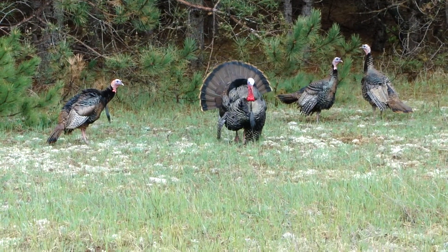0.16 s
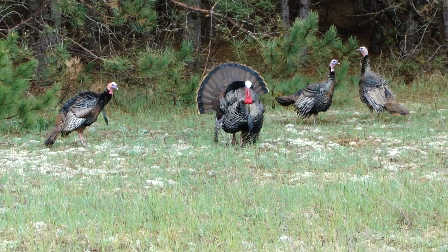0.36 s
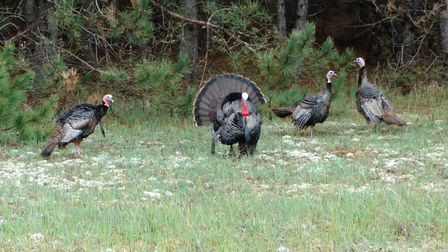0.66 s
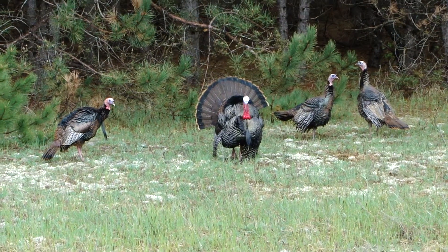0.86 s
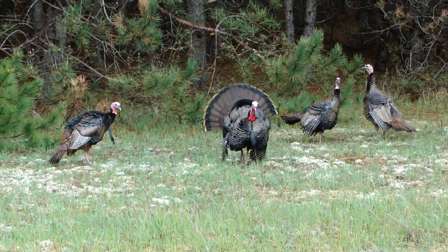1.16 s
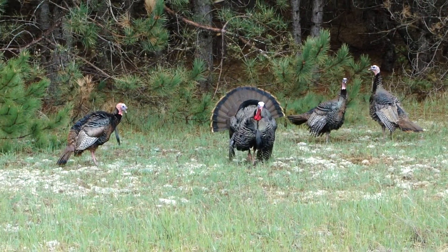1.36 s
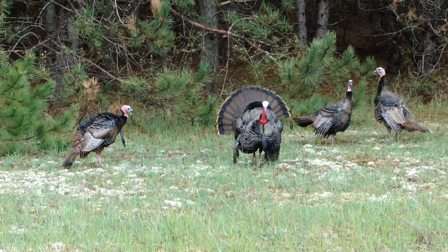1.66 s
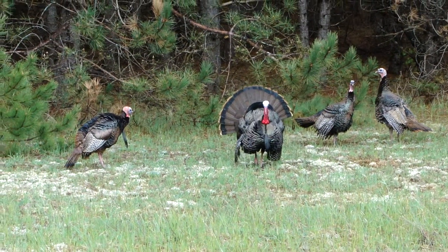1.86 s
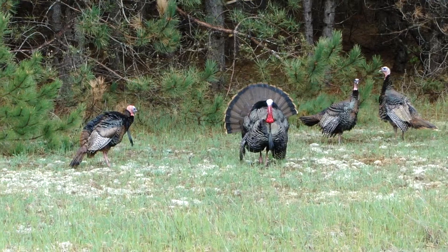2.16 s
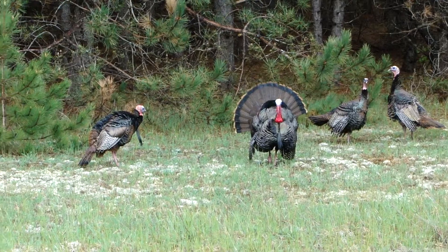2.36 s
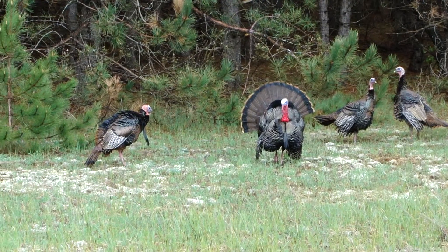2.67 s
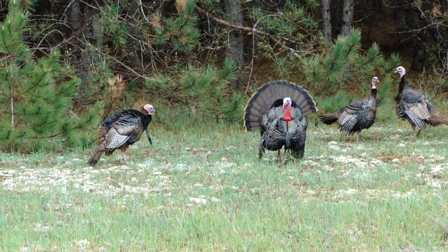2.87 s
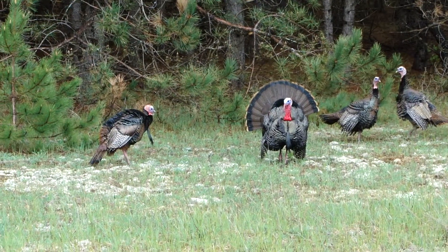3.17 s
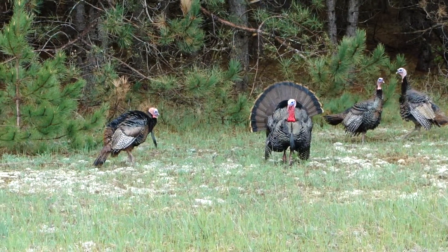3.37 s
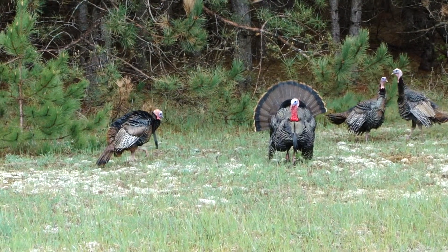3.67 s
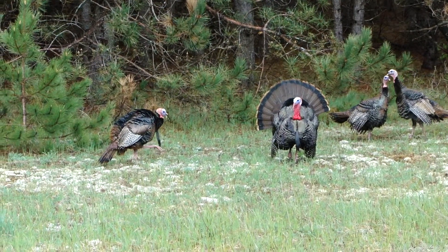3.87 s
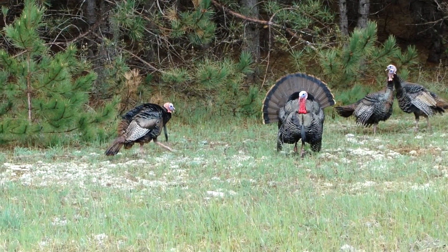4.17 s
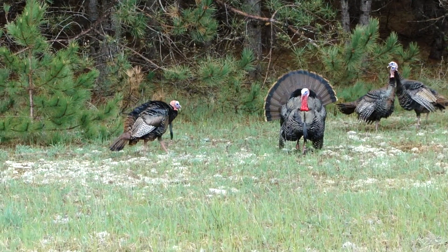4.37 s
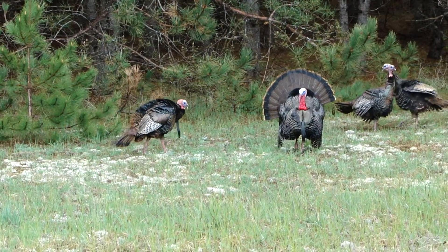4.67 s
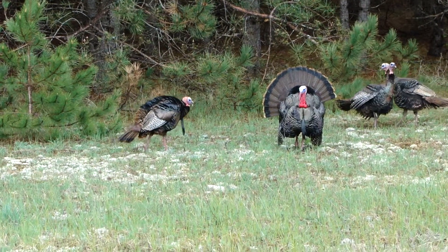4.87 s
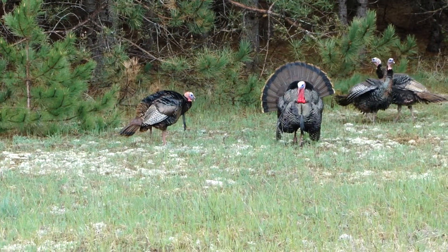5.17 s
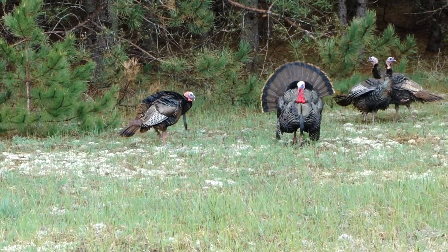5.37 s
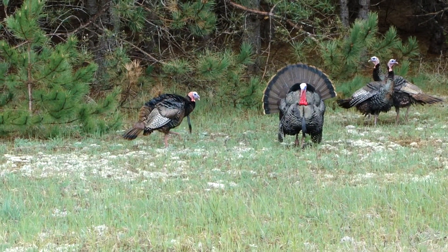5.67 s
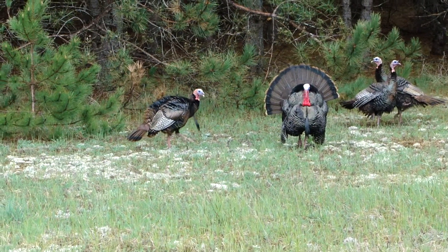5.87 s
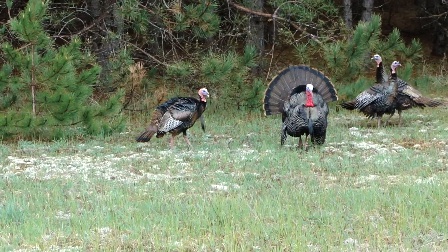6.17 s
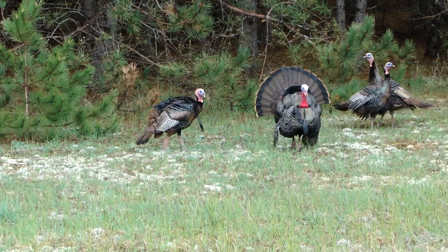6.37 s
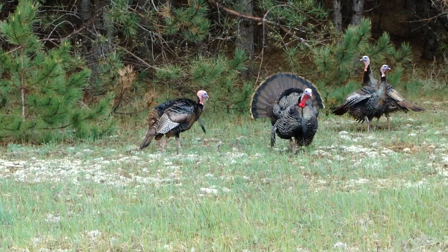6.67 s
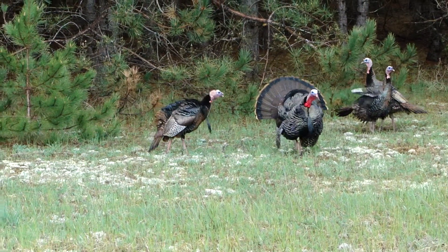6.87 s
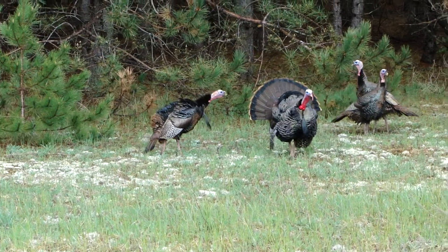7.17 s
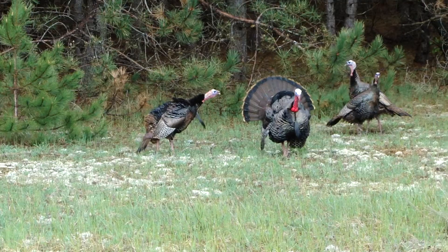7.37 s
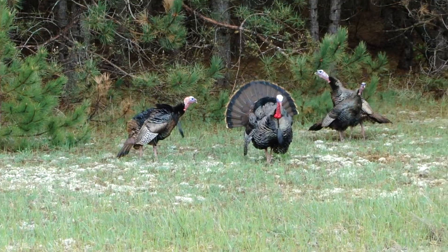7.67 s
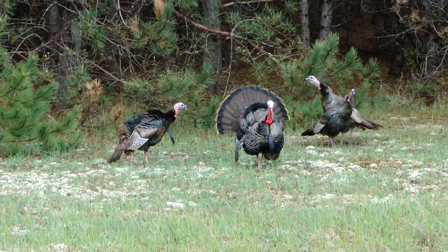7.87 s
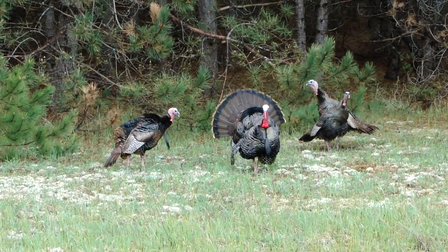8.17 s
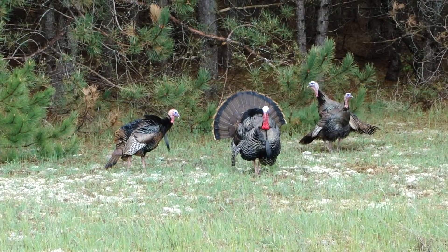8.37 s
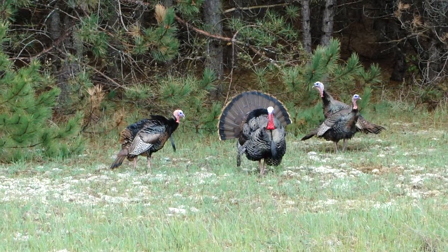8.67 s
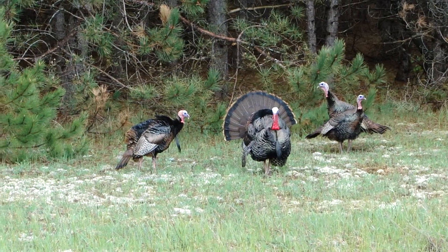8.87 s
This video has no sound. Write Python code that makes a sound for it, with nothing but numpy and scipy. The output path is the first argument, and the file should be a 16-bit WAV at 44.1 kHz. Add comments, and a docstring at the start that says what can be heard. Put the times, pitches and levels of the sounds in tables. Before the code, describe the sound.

In a grassy clearing by pines, soft air and a faint wavering hum lie under a turkey's thin whine and steady hoarse yelps. A short shrill gobble bursts across the early yelps, and a tiny far songbird trills twice. Then seven sharp, loud cutts come close to the microphone with small bill clicks, and a deeper, long gobble with a rattling middle answers, echoing off the trees.

```python
"""Soft air and a wavering hum fill a clearing by pines; a stem snaps now and then while a wild turkey
whines and yelps. A short gobble cuts across the yelps, and a small far bird trills in quick upward slurs.
Seven loud, close cutts follow, with bill clicks around them; a long gobble with a rattling middle answers.
Each call is a tone of the syrinx (the bird's voice box), clean or rough, shaped by four throat resonances.
Small sounds are short noise bursts, the trill is sine slurs, and the trees echo the turkeys."""
import sys
import numpy as np
from scipy import signal
from scipy.fft import rfft, irfft, next_fast_len
from scipy.io import wavfile

SR = 44100
rng = np.random.default_rng(int(sys.argv[2]) if len(sys.argv) > 2 else 0)


def digitize_waveform(pressure):
    """Quantize a signal to 16-bit integers and store it at the path in sys.argv[1].

    Rows of a 2-D input are taken as channels; values are limited to [-1, 1].
    """
    field = np.atleast_2d(pressure).T
    bounded = np.clip(field, -1, 1)
    quanta = np.round(bounded * 32767).astype(np.int16)
    wavfile.write(sys.argv[1], SR, quanta)


N = 398223  # length of the scene in samples, about 9 s

# A colour is the strength of throat resonances 2, 3 and 4 over the first, in dB.
# A bend is the pitch at start, middle and end, as multiples of a given pitch.
# Call levels are set before the bird's own gain_db; brightness is added to all three colour values.

# Still air, shape of its spectrum: frequency_hz, relative_level_db (per Hz)
AIR_SPECTRUM = [(15, -56), (25, -10), (86, -28), (102, -22), (189, -8.5), (293, -3), (388, -6.5), (419, -3),
                (556, -7), (838, -4.5), (1260, -12.5), (1630, -15), (3340, -24.5), (4790, -30),
                (11400, -39.5), (14900, -62), (22000, -120)]
# Left-right difference in the air, before side_db: frequency_hz, side_over_middle_db
AIR_WIDTH = [(60, -15), (110, -4), (190, -16), (340, -8.5), (610, -5.5), (1080, -3.5), (1940, -1),
             (3450, 2.5), (6160, -1), (11000, -4.5)]
AIR_DB = -43  # middle level of the air, before it sways

# Snapping stems: start_s, peak_db (before gain_db), centre_hz, left_minus_right_db
STEM_SNAPS = [(0.049, -36, 3840, 1), (2.8276, -33, 3930, 19), (4.316, -24.5, 10400, -17),
              (4.4268, -29, 4200, -12)]
# Bill clicks: start_s, peak_db (before gain_db), centre_hz, left_minus_right_db
BILL_CLICKS = [(5.162, -24.5, 1260, -11), (5.416, -22, 1260, -10), (5.685, -28, 1040, -7),
               (5.944, -25.5, 1560, -10), (6.176, -25.5, 1500, -15), (6.209, -27, 1670, -11),
               (8.336, -33, 2050, -15)]

# Thin whines before the yelps: start_s, length_s, level_db
WHINE_NOTES = [(0.077, 0.094, -43), (0.379, 0.0534, -25.5)]
WHINE_HZ, WHINE_BEND, WHINE_COLOUR = 762, (0.89, 1, 1.03), (13.7, 5.5, 2.2)

# A yelp opens as a whistle, breaks down an octave into a bright rasp, then darkens and sags.
# Yelps: start_s, length_s, whistle_s, whistle_over_rasp_db, rasp_level_db, break_brightness_db
YELP_NOTES = [(0.425, 0.059, 0.00049, 0, -26.5, -6), (0.658, 0.119, 0.00094, 16, -25, 2.5),
              (0.941, 0.086, 0, 0, -24.5, 2.5), (1.623, 0.131, 0.0022, 0, -22.5, -2.5),
              (1.975, 0.12, 0.026, 0.5, -23, 2), (2.321, 0.12, 0.019, 0, -24, 3.5),
              (2.672, 0.111, 0.034, 2, -24, -2.5), (3.037, 0.12, 0.044, 0, -24.5, -1.5),
              (3.446, 0.12, 0.048, 1.5, -24.5, -6), (3.827, 0.14, 0.02, 2, -26.5, 0)]
YELP_HZ, BREAK_ENDS_S, OVERLAP_S = 545.4, 0.062, 0.008
WHISTLE_BEND, WHISTLE_COLOUR = (2.04, 2.03, 1.897), (-8, -11.5, -31)
BREAK_BEND, BREAK_COLOUR = (1.01, 1.005, 0.98), (-1.5, -7, -17)
SAG_BEND, SAG_COLOUR = (1, 0.98, 0.905), (-26, -13.5, -19.5)

# In a gobble note the syrinx tightens and lets go: the pitch arches from a dark, slack gulp and back.
# Gobble notes: start_s, length_s, place_of_top (0-1), top_pitch_hz, level_db, rasp_when_tight (0-1),
# then the colour at the top: second_db, third_db, fourth_db
GOBBLE_NOTES = [(0.966, 0.033, 0.65, 875, -16, 0.72, 2, -4, 18),
                (1.028, 0.043, 0.53, 762, -17.5, 0.69, -4, -20, 1),
                (1.177, 0.024, 0.46, 639, -21.5, 0.64, -1.5, -5.5, -6),
                (1.222, 0.095, 0.46, 670, -21, 0.37, 2.5, 3.5, -11),
                (1.318, 0.05, 0.65, 520, -18.5, 0.77, -12, -12, -17),
                (1.362, 0.031, 0.48, 628, -19.5, 0.23, 4, 14, -2),
                (1.414, 0.016, 0.98, 506, -15, 0.1, -18, -16, -15),
                (1.43, 0.0525, 0.318, 654, -17, 0.04, 19.5, 29, 19),
                (1.545, 0.008, 0.5, 477, -24, 0.3, -30, -12, -14),
                (6.407, 0.035, 0.97, 686, -14, 0.13, 23.5, -23, 23.5),
                (6.472, 0.029, 0.93, 625.4, -19, 0.46, 12.5, -15, 8),
                (6.635, 0.022, 0.2, 534, -21.5, 0.46, -9, -12, -13),
                (6.683, 0.019, 0.86, 495, -21, 0.16, -9, -24, -19),
                (6.7, 0.046, 0.35, 667, -24, 0.57, 6, 0, 8.5),
                (6.799, 0.042, 0.55, 750, -19.5, 0.25, 7.5, 11.5, 8.5),
                (6.848, 0.026, 0.4, 523, -22, 0.79, -1, -19, -7.5),
                (6.878, 0.065, 0.64, 789, -17.5, 0.28, 5, 2.5, 0.5),
                (6.995, 0.045, 0.51, 624, -26.5, 0.5, 0.5, -8, -7.5),
                (7.041, 0.025, 0.67, 797, -17, 0.38, -1.5, -20, -14),
                (7.068, 0.049, 0.28, 814, -24.5, 0.52, -5, -9, -12),
                (7.116, 0.043, 0.83, 774, -21, 0.25, 2, -5.5, -9),
                (7.203, 0.03, 0.24, 778, -25.5, 1, -4.5, -11, -14),
                (7.242, 0.036, 0.19, 782, -27, 0.22, -2, -4, -9),
                (7.268, 0.033, 0.63, 581, -22, 0.19, 20, 20, 6),
                (7.343, 0.085, 0.6, 704, -13.5, 0.11, 15, 21, -1),
                (7.45, 0.052, 0.13, 595, -29, 0.45, -12, -11, -10),
                (7.915, 0.024, 0.55, 592, -20.5, 1, -22, 1.5, -1.5),
                (7.936, 0.081, 0.22, 668, -23, 0.58, -6, 1.5, -1.5),
                (8.038, 0.022, 0.45, 503, -26, 1, -4.5, -9, -7.5),
                (8.126, 0.063, 0.52, 652, -26, 1, -2, 5, -2),
                (8.207, 0.039, 0.23, 537.5, -17, 0.56, -44, 0.5, -6.5),
                (8.233, 0.025, 0.19, 872, -20.5, 0.12, -17, 11, -7),
                (8.254, 0.024, 0.28, 522, -18.5, 0.9, -17, -9, -16)]
SLACK_HZ = 484.2  # pitch at rest
TIGHT_HZ = 750  # top pitch at which the third resonance is left unmoved
TIGHTEN_S = 0.03  # half-width of the pitch arch
SLACK_RASP = 0.24  # extra rasp at rest

# Songbird trills: start_s, number_of_notes, average_level_db
SONGBIRD_TRILLS = [(3.326, 8, -61), (4.354, 8, -57)]

# A cutt is a falling chirp, a loud tone, then a low creak as the membranes slacken.
# Cutts: start_s, chirp_s, chirp_hz, chirp_level_db, tone_s, tone_hz, tone_level_db,
# tone_brightness_db, creak_hz, creak_level_db
CUTT_NOTES = [(4.986, 0.016, 2190, -25, 0.016, 942, -9, -1, 452, -14.5),
              (5.248, 0.014, 1494, -14.5, 0.016, 972, -10, 0.5, 690, -10),
              (5.507, 0.0084, 1520, -7, 0.026, 1104, -10.5, 5, 369.7, -16),
              (5.745, 0.0062, 1510, -6.5, 0.031, 1074, -10.5, 40, 364, -17),
              (6.017, 0.008, 1560, -6, 0.029, 1119, -11.5, 19, 381, -25.5),
              (6.255, 0.0098, 1627, -7.5, 0.041, 1145, -12.5, 24, 391, -25),
              (6.491, 0.01, 1602, -6, 0.026, 1143, -11, 14, 383, -22)]
CHIRP_BEND, CHIRP_COLOUR = (1.2, 0.98, 0.83), (29.4, 20.2, 4.1)
TONE_BEND, TONE_COLOUR = (1.1, 0.98, 0.93), (-12, 0, -5)
CREAK_BEND, CREAK_COLOUR = (1.05, 0.96, 0.93), (22.5, 19.6, 20)
CREAK_S, CREAK_ENTERS = 0.039, 0.7  # length; share of the tone after which it starts
CREAK_USUAL_HZ, CREAK_DULLING = 392, (4.1, 0, -12)  # colour change in dB per octave above this pitch

# In the middle of the long gobble the voice rattles around one pitch.
# Rattle beats: start_s, length_s, middle_pitch_hz, level_db, rasp (0-1), brightness_db
RATTLE_BEATS = [(7.505, 0.019, 740, -23.5, 0.3, 0), (7.539, 0.032, 756, -25, 0.97, -1),
                (7.555, 0.035, 731, -18.5, 0.44, 2), (7.589, 0.067, 763, -18.5, 1, -4),
                (7.673, 0.091, 757, -24, 0.52, 1), (7.732, 0.024, 765, -16.5, 0.6, -3.5),
                (7.766, 0.073, 743.5, -24, 0.97, -4), (7.79, 0.02, 768, -18, 0.2, 0),
                (7.857, 0.039, 735, -22.5, 0.83, -0.5)]
TUMBLE, TUMBLE_PER_S = 0.075, 60  # size as a share of the pitch; new random values a second
RATTLE_COLOUR = (2.9, 1.7, -6)

# Throat resonances, lowest first; the gape scales the third frequency: frequency_hz, width_hz
YELP_THROAT = [(1060, 387), (1660, 555), (2600, 420), (3750, 960)]
SHRILL_THROAT = [(1030, 290), (1850, 670), (3200, 500), (3680, 1250)]
GOBBLE_THROAT = [(970, 360), (1540, 694), (2420, 540), (3900, 1010)]
CUTT_THROAT = [(1020, 1750), (1530, 510), (2300, 430), (3250, 660)]
# Weaker resonances of windpipe and beak: frequency_hz, width_hz, level_over_upper_throat_db
YELP_BEAK = [(603, 180, -23), (6200, 5600, -37), (10100, 4300, -33.5)]
GOBBLE_BEAK = [(570, 450, -23.5), (5040, 910, -14), (7080, 690, -31), (10540, 1800, -36.5)]
CUTT_BEAK = [(365, 74, -42), (4950, 490, -18.5), (6600, 400, -23.5), (7280, 630, -27.5), (9550, 1200, -17)]

# The four voices. jitter: pitch unsteadiness at full rasp; hiss: amount of breath noise;
# twin: strength of the second pitch at full rasp; twin_ratio: that pitch over the main one.
YELPER = dict(throat=YELP_THROAT, beak=YELP_BEAK,
              jitter=0.094, hiss=0.35, twin=0.27, twin_ratio=0.88, gain_db=-1)
SHRILL_GOBBLER = dict(throat=SHRILL_THROAT, beak=GOBBLE_BEAK,
                      jitter=0.051, hiss=0.87, twin=0.59, twin_ratio=0.68, gain_db=-2)
DEEP_GOBBLER = dict(throat=GOBBLE_THROAT, beak=GOBBLE_BEAK,
                    jitter=0.059, hiss=0.92, twin=0.83, twin_ratio=0.66, gain_db=-0.75)
CUTTER = dict(throat=CUTT_THROAT, beak=CUTT_BEAK,
              jitter=0.16, hiss=0.42, twin=0.32, twin_ratio=0.72, gain_db=1.5)

# Stereo balance of the direct calls: frequency_hz, left_minus_right_db
FAR_BALANCE = [(700, 0.5), (1200, -3.5), (1650, 1.5), (2650, -10.5), (3500, 5.5), (7000, -1), (10000, -35)]
NEAR_BALANCE = [(900, -1), (1600, -10), (2000, -2), (2600, -6), (4200, -2.5), (7000, -4), (9000, -38)]
# How far the left side lags the right: frequency_hz, lag_radians
LEFT_LAG = [(30, 2), (300, 0.1), (700, 0.53), (1100, 1.76), (1600, 1.69), (2300, 2), (3200, 2), (4200, 4),
            (6000, 2.5), (11000, 9.5)]
TOP_HZ = 12000  # upper edge of the sound


def undb(db):
    """Turn decibels into a gain."""
    return 10 ** (np.asarray(db) / 20)


def unit(x):
    """Scale a sound to an rms (average strength) of 1."""
    return x / np.sqrt(np.mean(x ** 2) + 1e-18)


def add(track, s, x):
    """Mix x into the track from time s on."""
    i = max(int(s * SR), 0)
    track[i:i + len(x)] += x[:max(len(track) - i, 0)]


def resonate(x, hz, width):
    """Ring at one frequency, as an air cavity does, with steep falls on both sides."""
    size = next_fast_len(len(x) + 1024)
    f = np.arange(size // 2 + 1) * SR / size + 1  # 1 Hz up, to avoid dividing by zero
    off = 1j * (f * f - hz * hz) / (f * width)
    skirt = 1 + np.sqrt(2) * off / 1.7 + (off / 1.7) ** 2
    response = 1 / ((1 + off) * skirt)
    return irfft(rfft(x, size) * response, size)[:len(x)]


def contour(points):
    """Join (Hz, value) points on a log frequency axis, for every frequency of the whole scene."""
    hz, values = np.transpose(points)
    f = np.arange(N // 2 + 1) * SR / N + 1
    return np.interp(np.log(f), np.log(hz), values)


def wander(size, per_s):
    """Draw a random line of straight steps between per_s new values a second."""
    steps = np.arange(size) * per_s / SR
    values = rng.standard_normal(size // 4 + 2)
    return np.interp(steps, np.arange(len(values)), values)


def clearing(hum_hz, hum_db, sway_db, side_db):
    """Soft air in the pines is shaped noise that sways in level; a far hum is a wavering sine."""
    mid_spectrum = rfft(rng.standard_normal(N)) * undb(contour(AIR_SPECTRUM))
    mid = irfft(mid_spectrum, N)
    side_shape_db = contour(AIR_SPECTRUM) + contour(AIR_WIDTH) + side_db
    side = irfft(rfft(rng.standard_normal(N)) * undb(side_shape_db), N)
    level = undb(AIR_DB + sway_db * wander(N, 1.7))
    air = np.array([mid + side, mid - side]) / np.std(mid) * level
    hum_pitch = hum_hz + 3 * wander(N, 12)
    hum_level = undb(hum_db + 2.5 * wander(N, 3.4))
    hum = np.sin(2 * np.pi * np.cumsum(hum_pitch) / SR) * hum_level
    return air + hum


def ticks(rows, decay_s, spread, gain_db):
    """Tiny dry cracks: noise that dies in a few milliseconds, through one broad resonance."""
    out = np.zeros((2, N))
    t = np.arange(SR // 20) / SR
    for s, db, hz, pan_db in rows:
        burst = rng.standard_normal(len(t)) * np.exp(-t / decay_s)
        crack = resonate(burst, hz, spread * hz)
        crack = crack / np.abs(crack).max()
        for channel, sign in zip(out, (1, -1)):
            add(channel, s, crack * undb(db + gain_db + sign * pan_db / 2))
    return out


def arch(length, peak, taper):
    """One push of air, strongest at the given share of its length; taper thins its ends."""
    place = np.linspace(0, 1, int(max(length, .004) * SR))
    u = np.interp(place, [0, np.clip(peak, .05, .95), 1], [0, .5, 1])
    return np.abs(np.sin(np.pi * u)) ** taper


def turkey(pitch, push, rasp, colour, gape, throat, beak, jitter, hiss, twin, twin_ratio, gain_db):
    """The syrinx pulses; rasp unsettles its pitch and strength and lets air through once a cycle."""
    size, ring = len(push), SR // 200  # 5 ms is left for the throat to ring on
    shaken_pitch = pitch * (1 + jitter * rasp * wander(size, pitch.mean()))
    phase = 2 * np.pi * np.cumsum(shaken_pitch) / SR
    k = np.arange(1, int(TOP_HZ / pitch.mean()) + 1)[:, None]  # harmonic numbers
    pulses = np.sum(np.cos(k * phase) / np.sqrt(k), axis=0)
    # in a rasp the other side of the syrinx joins in at a lower pitch of its own
    twin_pulses = np.sum(np.cos(k * twin_ratio * phase) / np.sqrt(k), axis=0)
    pulses = pulses + twin * rasp * twin_pulses
    air = hiss * (rasp + 0.22) * (1 + 1.13 * np.cos(phase)) * rng.standard_normal(size)
    flutter = 1 + .7 * rasp * np.tanh(wander(size, 450))
    source = np.pad((unit(pulses) + air) * push * flutter, (0, ring))
    # the gape of the beak moves the third resonance
    modes = [throat[0], throat[1], (gape * throat[2][0], throat[2][1]), throat[3]]
    gains = undb([np.pad(db + np.zeros(size), (0, ring), "edge") for db in (0, *colour)])
    gains = gains / np.linalg.norm(gains, axis=0)
    voice = sum(g * unit(resonate(source, hz, width)) for g, (hz, width) in zip(gains, modes))
    edge = sum(undb(d) * unit(resonate(source, hz, width)) for hz, width, d in beak)
    upper_throat = np.linalg.norm(gains[2:], axis=0)
    voice = unit(voice + upper_throat * edge)
    push_strength = np.sqrt(np.sum(push ** 2) / len(voice))
    return voice * undb(gain_db) * push_strength


def syllable(bird, length, db, hz, bend, colour, peak, taper, rasp, gape):
    """One push of air on one pitch that bends along a smooth curve."""
    push = arch(length, peak, taper)
    curve = np.polyfit([0, .5, 1], bend, 2)
    pitch = hz * np.polyval(curve, np.linspace(0, 1, len(push)))
    return undb(db) * turkey(pitch, push, rasp, colour, gape, **bird)


def whines():
    """Thin whines: a lightly rasping syrinx whose pitch climbs."""
    out = np.zeros(N)
    for s, length, db in WHINE_NOTES:
        whine = syllable(YELPER, length, db, WHINE_HZ, WHINE_BEND, WHINE_COLOUR,
                         peak=1.0, taper=0.44, rasp=0.26, gape=0.924)
        add(out, s, whine)
    return out


def yelps():
    """The syrinx whistles, breaks into a bright rasp, then sags into a dark one."""
    out = np.zeros(N)
    for s, length, whistle_s, whistle_db, db, bright_db in YELP_NOTES:
        if whistle_s > OVERLAP_S:  # shorter whistles are left out
            whistle = syllable(YELPER, whistle_s + OVERLAP_S / 2, db + whistle_db, YELP_HZ,
                               WHISTLE_BEND, WHISTLE_COLOUR,
                               peak=0.57, taper=0.11, rasp=0.065, gape=0.835)
            add(out, s, whistle)
        break_start = max(whistle_s - OVERLAP_S / 2, 0)
        bright_rasp = syllable(YELPER, BREAK_ENDS_S - break_start, db, YELP_HZ,
                               BREAK_BEND, np.add(BREAK_COLOUR, bright_db),
                               peak=0.32, taper=0.5, rasp=0.89, gape=0.86)
        add(out, s + break_start, bright_rasp)
        sag_start = min(BREAK_ENDS_S, length) - OVERLAP_S
        dark_rasp = syllable(YELPER, length - sag_start, db, YELP_HZ, SAG_BEND, SAG_COLOUR,
                             peak=0.43, taper=0.37, rasp=0.916, gape=1.046)
        add(out, s + sag_start, dark_rasp)
    return out


def ports(x, balance):
    """Direct sound from the right: the left side hears it later and with another colour."""
    tilt = undb(contour(balance))
    right = rfft(x) * np.sqrt(2 / (1 + tilt ** 2))  # keeps the total power of both sides
    left = right * tilt * np.exp(-1j * contour(LEFT_LAG))
    return np.array([irfft(left, N), irfft(right, N)])


def trees(x, early_db, early_s, late_db, t60_s, dull_hz):
    """Grass and near branches scatter at once; the trunks return a longer, duller tail."""
    t = np.arange(SR) / SR
    out = []
    shared = rng.standard_normal((2, SR))  # the part both ears have in common
    for _ in range(2):
        near, far = shared + 3.2 * rng.standard_normal((2, SR))
        near = near * np.exp(-t / early_s) * (t > .003)
        near = near / np.linalg.norm(near)
        far = signal.sosfilt(signal.butter(2, dull_hz, fs=SR, output="sos"), far)
        # the tail builds up, then falls at 60 dB per t60_s
        far = far * np.exp(-np.log(1000) * t / t60_s) * (1 - np.exp(-t / 0.021))
        far = far / np.linalg.norm(far) * np.sqrt(2 * dull_hz / SR)
        echo = undb(early_db) * near + undb(late_db) * far
        out.append(signal.fftconvolve(x, echo)[:N])
    return np.array(out)


def gobble(notes, bird, slack_colour, taper, gape_per_octave):
    """Each note tightens from the slack pitch to its top and back; tension clears and recolours it."""
    out = np.zeros(N)
    for s, length, top, top_hz, db, rasp, *top_colour in notes:
        push = arch(length, top, taper)
        from_top_s = np.arange(len(push)) / SR - top * length
        tension = np.exp(-(from_top_s / TIGHTEN_S) ** 2)
        pitch = SLACK_HZ + (top_hz - SLACK_HZ) * tension
        colour = [slack + (tight - slack) * tension for slack, tight in zip(slack_colour, top_colour)]
        gape = 1 + gape_per_octave * np.log2(TIGHT_HZ / top_hz)
        note_rasp = rasp + SLACK_RASP * (1 - tension)
        add(out, s, undb(db) * turkey(pitch, push, note_rasp, colour, gape, **bird))
    return out


def songbird(low_hz, high_hz, gap_s, note_s):
    """A far trill of evenly spaced sine notes that slide upward, uneven in level."""
    out = np.zeros(N)
    size = int(note_s * SR)
    pitch = np.linspace(low_hz, high_hz, size)
    note = np.sin(2 * np.pi * np.cumsum(pitch) / SR) * np.hanning(size)
    for s, notes, db in SONGBIRD_TRILLS:
        for k in range(round(notes)):
            note_db = db + 1.5 * rng.standard_normal()
            add(out, s + k * gap_s, note * undb(note_db))
    return out


def cutts():
    """The syrinx chirps, sounds a tone and slackens into a creak in one quick burst."""
    out = np.zeros(N)
    for (s, chirp_s, chirp_hz, chirp_db, tone_s, tone_hz, tone_db, bright_db,
         creak_hz, creak_db) in CUTT_NOTES:
        chirp = syllable(CUTTER, chirp_s, chirp_db, chirp_hz, CHIRP_BEND, CHIRP_COLOUR,
                         peak=0.2, taper=0.76, rasp=0.24, gape=0.977)
        add(out, s, chirp)
        tone = syllable(CUTTER, tone_s, tone_db, tone_hz, TONE_BEND, np.add(TONE_COLOUR, bright_db),
                        peak=0.05, taper=0.66, rasp=0.23, gape=1.063)
        add(out, s + chirp_s, tone)
        octaves_up = np.log2(creak_hz / CREAK_USUAL_HZ)
        colour = np.add(CREAK_COLOUR, np.multiply(CREAK_DULLING, octaves_up))
        creak = syllable(CUTTER, CREAK_S, creak_db, creak_hz, CREAK_BEND, colour,
                         peak=0.059, taper=1.98, rasp=0.44, gape=1.09)
        add(out, s + chirp_s + CREAK_ENTERS * tone_s, creak)
    return out


def rattle():
    """Rough beats of the syrinx whose pitch tumbles at random about a middle."""
    out = np.zeros(N)
    for s, length, hz, db, rasp, bright_db in RATTLE_BEATS:
        push = arch(length, peak=0.37, taper=0.53)
        pitch = hz * (1 + TUMBLE * wander(len(push), TUMBLE_PER_S))
        colour = np.add(RATTLE_COLOUR, bright_db)
        add(out, s, undb(db) * turkey(pitch, push, rasp, colour, gape=0.89, **DEEP_GOBBLER))
    return out


def scene():
    """Callers near and far, their echoes, and the small sounds of the clearing."""
    air = clearing(hum_hz=424, hum_db=-52.0, sway_db=0.6, side_db=3.5)
    snaps = ticks(STEM_SNAPS, decay_s=0.0027, spread=0.59, gain_db=-8.0)
    clicks = ticks(BILL_CLICKS, decay_s=0.0035, spread=0.65, gain_db=-2)
    # one bird gobbles across the yelps, another answers the cutts
    early = [row for row in GOBBLE_NOTES if row[0] < 2]
    late = [row for row in GOBBLE_NOTES if row[0] >= 2]
    first = gobble(early, SHRILL_GOBBLER, slack_colour=(-24, -17, -24), taper=0.51, gape_per_octave=0.015)
    second = gobble(late, DEEP_GOBBLER, slack_colour=(-10, -9, -11), taper=0.52, gape_per_octave=0.13)
    flock = whines() + yelps() + first + second + rattle()
    far_echo = trees(flock, early_db=-10.5, early_s=0.0037, late_db=-10.5, t60_s=0.51, dull_hz=2700)
    far = ports(flock, FAR_BALANCE) + far_echo
    trill = songbird(low_hz=4400, high_hz=5340, gap_s=0.0685, note_s=0.0323)
    close = cutts()
    near_echo = trees(close, early_db=-9, early_s=0.0056, late_db=-39, t60_s=1.0, dull_hz=4000)
    near = ports(close, NEAR_BALANCE) + near_echo
    return air + snaps + clicks + far + trill + near


def record(dry):
    """Flatten peaks at full scale, then cut the deepest bass and everything above the top edge."""
    clipped = np.clip(dry, -1, 1)
    thin = signal.sosfilt(signal.butter(2, 70, "high", fs=SR, output="sos"), clipped)
    return signal.sosfilt(signal.ellip(8, .2, 70, TOP_HZ, fs=SR, output="sos"), thin)


dry = scene()
out = record(dry)
digitize_waveform(out)
```